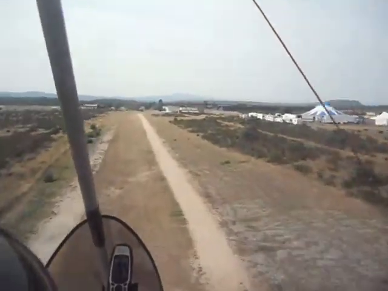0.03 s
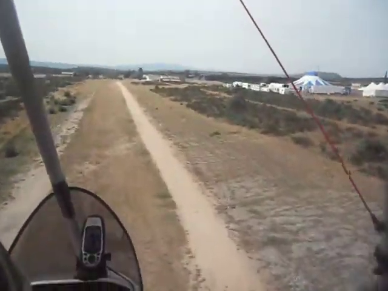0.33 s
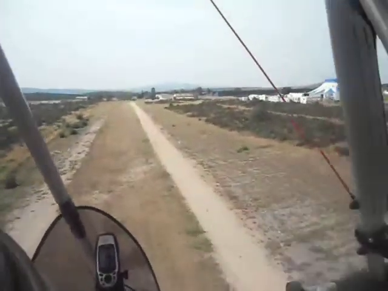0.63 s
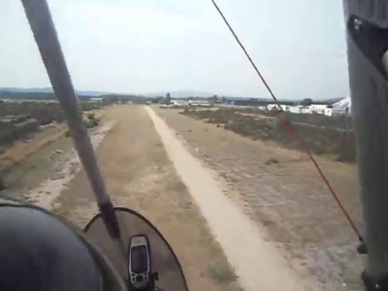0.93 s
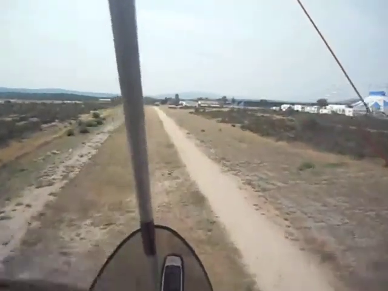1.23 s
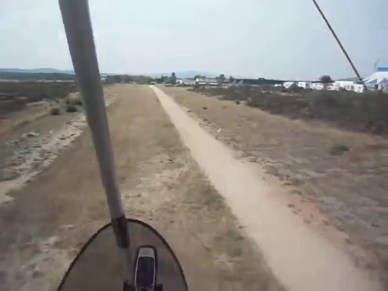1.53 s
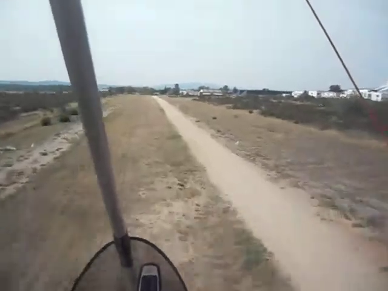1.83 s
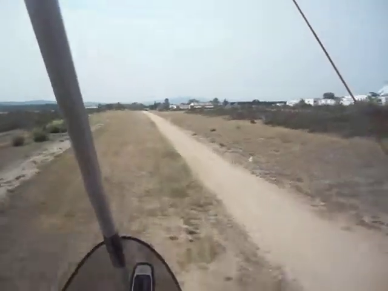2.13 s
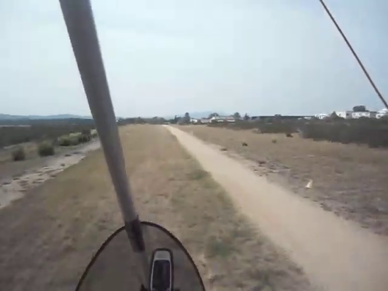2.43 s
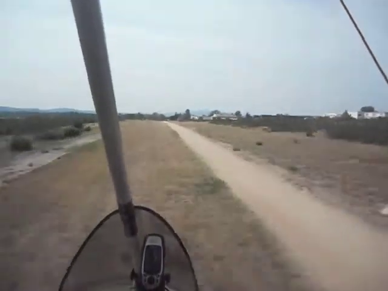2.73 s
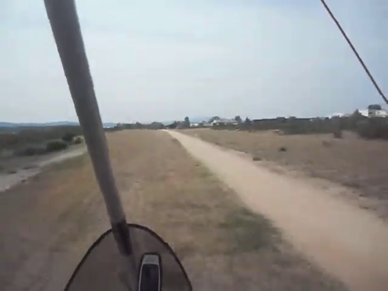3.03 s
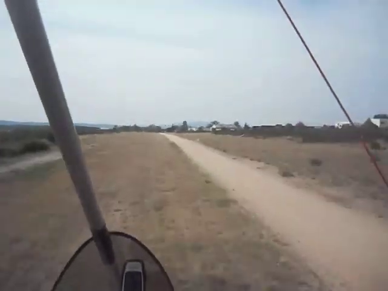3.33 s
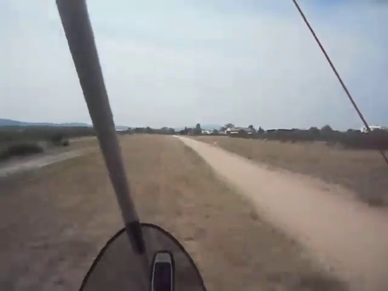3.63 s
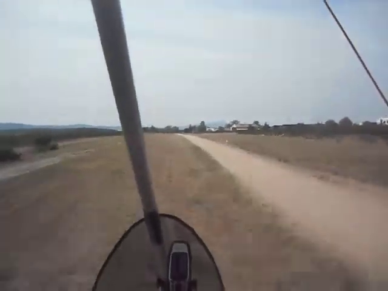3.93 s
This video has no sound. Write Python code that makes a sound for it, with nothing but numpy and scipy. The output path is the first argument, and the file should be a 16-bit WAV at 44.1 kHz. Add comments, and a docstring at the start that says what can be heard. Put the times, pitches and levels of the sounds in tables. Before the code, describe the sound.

Rough, rumbling wind buffets and overloads a microphone aboard a small open aircraft descending over fields. It spits and crackles, drops out for instants and growls in one stronger gust, then eases slightly near the ground.

```python
"""On an open ultralight gliding down to a dirt strip, wind roars over a camera microphone and is all one hears.
Large eddies thump, smaller ones roar and tear into spits of hiss and crackle. Now and then the airstream
drops away for an instant or slaps back. A hollow hum wanders in the rumble; the strongest gust growls.
The overloaded microphone squashes the peaks; near the ground the flow gets smoother and a little quieter."""
import sys
import numpy as np
from scipy import signal
from scipy.fft import rfft, irfft
from scipy.io import wavfile
from scipy.ndimage import uniform_filter1d

SR = 44100
rng = np.random.default_rng(int(sys.argv[2]) if len(sys.argv) > 2 else 0)


def transcribe(signal):
    """Save signal, clipped to [-1, 1], as a 16-bit WAV file at the path in sys.argv[1]."""
    frames = np.atleast_2d(signal).T
    limited = np.clip(frames, -1, 1)
    pcm = np.round(limited * 32767).astype(np.int16)
    wavfile.write(sys.argv[1], SR, pcm)


N = 176400

# airstream faders: t/s, buffet level/dB, roar level/dB, hiss level/dB, raggedness/0-1
AIRSTREAM = [(0, -14.5, -13.5, -27.5, 0.6), (.25, -14.5, -14, -28, 0.77), (.55, -14.5, -14, -26.5, 0.39),
             (.9, -19.5, -15, -26.5, 0.28), (1.1, -12.5, -13.5, -27.5, 0.77), (1.4, -17, -13.5, -27, 0.6),
             (1.55, -17.5, -13, -25.5, 0.63), (1.74, -13, -14, -34, 0.94), (1.9, -14.5, -13, -25, 0.57),
             (2.1, -14, -11, -31, 1), (2.3, -17, -15.5, -28.5, .55), (2.599, -17, -14.5, -26.5, 0.43),
             (2.901, -14, -15.5, -30.5, 0.74), (3.1, -16.5, -15.5, -27.5, 0.33),
             (3.32, -25, -19.5, -29.5, 0.31), (3.47, -20.5, -17, -29, 0.33), (3.701, -15, -16.5, -29, 0.36),
             (3.881, -20.5, -14.5, -28.5, 0.34), (4, -23, -16.5, -29, 0.36)]
# the air leaves the microphone (lulls) or slaps back (blasts): t/s, length/s, hiss/dB, roar/dB
LULL_DIPS = [(0.057, 0.018, -13, -9.5), (0.143, 0.0092, -9, -10), (.187, .015, -19, -13),
             (.22, .021, -24, -19), (.435, .018, -1, -11), (0.497, 0.0063, -29, -6), (.645, .02, -3, -14),
             (1.009, 0.023, -11, -6), (1.127, 0.012, -19, -7), (1.597, .024, -10, -3),
             (1.654, .018, -15, -10), (1.707, .008, -14, -6), (1.807, .008, -11, -5),
             (2.005, .015, -10, -4), (2.114, 0.021, -18, -9), (2.339, 0.0069, -11, -1),
             (2.405, .012, -2, -5), (2.58, 0.015, -10, -2.5), (2.816, 0.01, -14, -6.5),
             (2.89, 0.032, -6, -3.5), (2.925, 0.021, -8, -1.5), (2.957, 0.0096, -3, -7),
             (3.024, 0.015, -7, -8), (3.43, 0.0074, -15, -8)]
BLAST_HITS = [(0.024, 0.049, 3.5, 0.5), (0.241, 0.013, -0.5, 4), (0.575, 0.011, 5.5, 6.5),
              (1.133, 0.0091, 8.5, 3), (1.62, .022, 4, 2), (1.667, 0.017, 7, 4.5), (2.413, 0.0094, 3.5, 1),
              (.202, .013, 5, 6), (2.61, .035, 4, 2), (2.829, .01, 7, 6), (2.942, .012, 8, 8),
              (3.054, 0.02, 2, 1.5), (3.435, .012, -3, 6), (3.735, 0.0099, -5, 4)]
# tone colour of each wind layer: f/Hz, level/dB
BUFFET_EQ = [(6, -38), (16, -1), (40, -1), (70, -2), (120, -8), (200, -18), (500, -53), (1500, -94)]
ROAR_EQ = [(30, -11), (90, -7.5), (170, -1), (240, -0.5), (340, -0.5), (520, -4.5), (800, -8), (1300, -12),
           (2200, -20), (4000, -21), (10000, -78)]
HISS_EQ = [(300, -26), (900, -0.5), (1600, 7), (2300, 6), (3200, 1.5), (5000, -0.5), (7000, -2),
           (9000, -7.5), (10200, -12.5), (12000, -22)]
CRACKLE_EQ = [(300, -16), (1000, -2), (3000, 0.5), (6000, 1), (9000, 2), (10200, -2.5), (12000, -8)]
# the wandering hollow hum and the strongest gust's falling growl: t/s, f/Hz, level/dB
HUM_SWEEP = [(0, 180.6, -13), (.55, 180, -24.5), (0.899, 150, -28), (1.15, 144.9, -14.5),
             (1.349, 110, -19.5), (1.65, 135, -22), (1.85, 110, -17), (2.051, 131.1, -13.5),
             (2.249, 76.7, -20), (2.37, 35, -9), (2.548, 59.9, -49), (4, 102.2, -28.5)]
GROWL_SWEEP = [(1.8, 423.8, -49), (1.9, 373.3, -22), (1.999, 299.3, -19), (2.13, 312.6, -12),
               (2.221, 259.5, -22), (2.301, 228, -45)]

GUST_HZ, EDDY_HZ, SPIT_HZ, WAVER_HZ = 69, 317, 1200, 71  # modulation speeds
GUST_DB, EDDY_DB, SPIT_DB, PUSH_DB = 3, 11, 7, 5.5  # hiss flare depths, before raggedness and limiting
BUFFET_TRIM_DB, ROAR_TRIM_DB, HISS_TRIM_DB, CRACKLE_TRIM_DB = -1, 1, -1, -3
TIME, FREQS = np.arange(N) / SR, np.arange(N // 2 + 1) * SR / N


def undb(db):
    """Decibels to gain."""
    return 10 ** (np.asarray(db) / 20)


def colour(x, eq):
    """Shape x with an EQ curve and set its rms to 1."""
    hz, db = np.array(eq, float).T
    curve_db = np.interp(np.log(np.maximum(FREQS, 1)), np.log(hz), db)
    y = irfft(rfft(x) * undb(curve_db), N)
    return y / y.std()


def noise(eq):
    """Coloured noise of rms 1."""
    return colour(rng.standard_normal(N), eq)


def wobble(rate_hz):
    """Smooth random modulator of rms 1, rolling off above rate_hz."""
    y = irfft(rfft(rng.standard_normal(N)) / np.sqrt(1 + (2 * FREQS / rate_hz) ** 4), N)
    return y / y.std()


def flutter(db):
    """A fluctuating gain whose power stays near 1 over a quarter of a second."""
    gain = undb(db)
    return gain / np.sqrt(uniform_filter1d(gain ** 2, size=SR // 4))


def buffet(level_db):
    """Large eddies thump on the microphone."""
    return noise(BUFFET_EQ) * undb(BUFFET_TRIM_DB + level_db)


def hollow_tone(sweep):
    """Hum or growl: a gliding narrow band of pressure swings, wavering in strength and phase."""
    at, hz, db = np.array(sweep, float).T
    phase = 2 * np.pi * np.cumsum(np.interp(TIME, at, hz)) / SR
    band = wobble(WAVER_HZ) * np.cos(phase) + wobble(WAVER_HZ) * np.sin(phase)
    return undb(np.interp(TIME, at, db)) * band / np.sqrt(2)


def roar(level_db, gust, eddy, gust_db=1.7, eddy_db=3.8):
    """Smaller eddies roar in the low mids, shaken by the turbulence."""
    return noise(ROAR_EQ) * undb(ROAR_TRIM_DB + level_db) * flutter(gust_db * gust + eddy_db * eddy)


def overload(pressure, headroom=0.51, bias=0.24, muffle_hz=1840):
    """The microphone squashes large pressures, sooner on one side; a low-pass keeps the swings round."""
    squashed = headroom * (np.tanh(pressure / headroom - bias) + np.tanh(bias))
    return signal.sosfilt(signal.butter(2, muffle_hz, fs=SR, output="sos"), squashed)


def pressure_push(pressure, memory_s=0.0078, lag_s=0.0004, knee=0.073):
    """Sidechain from -1 to 1: how far the pressure has just risen above its recent mean."""
    decay = np.exp(-1 / (memory_s * SR))
    rise = pressure - signal.lfilter([1 - decay], [1, -decay], pressure)
    return np.tanh(np.interp(TIME - lag_s, TIME, rise) / knee)


def hiss(flare_db, limit_db=12):
    """Torn air spits: the hiss can flare only so far, but can drop much further."""
    limited_db = np.minimum(flare_db, limit_db * np.tanh(flare_db / limit_db))
    return noise(HISS_EQ) * flutter(limited_db)


def crackle(level_db, eddy, per_second=130, scatter_db=3.5, eddy_db=3):
    """Lone sharp pressure fronts snap at random, brighter than the hiss and stronger inside an eddy."""
    size = undb(scatter_db * np.clip(rng.standard_normal(N), -2, 2))
    polarity = np.sign(rng.standard_normal(N))
    fronts = size * polarity * (rng.random(N) < per_second / SR)
    return colour(fronts, CRACKLE_EQ) * undb(CRACKLE_TRIM_DB + level_db + eddy_db * (eddy - 1.5))


def jolts(cues):
    """Lulls or blasts: brief fader moves in dB for hiss and roar, flat-topped with quick edges."""
    moves_db = np.zeros((2, N))
    for at, length, hiss_db, roar_db in cues:
        shape = np.exp(-(2 * (TIME - at) / length) ** 4)
        moves_db += np.outer([hiss_db, roar_db], shape)
    return moves_db


def scene():
    """Mono wind: rumble and roar overload the microphone, and each push of pressure spits on top."""
    at, *faders = np.array(AIRSTREAM, float).T
    buffet_db, roar_db, hiss_db, ragged = (np.interp(TIME, at, fader) for fader in faders)
    hiss_jolt_db, roar_jolt_db = jolts(LULL_DIPS) + jolts(BLAST_HITS)
    gust, spit = wobble(GUST_HZ), wobble(SPIT_HZ)
    eddy = 1.5 * np.tanh(wobble(EDDY_HZ))
    rumble = buffet(buffet_db) + hollow_tone(HUM_SWEEP) + hollow_tone(GROWL_SWEEP)
    pressure = rumble * undb(roar_jolt_db / 2) + roar(roar_db + roar_jolt_db, gust, ragged * eddy)
    push = pressure_push(pressure)
    flare_db = ragged * (GUST_DB * gust + EDDY_DB * eddy + SPIT_DB * spit + PUSH_DB * push)
    top_end = hiss(flare_db) * undb(hiss_jolt_db)
    top_end += crackle(roar_jolt_db, eddy) * ragged * (1 + push)
    return (overload(pressure) + top_end * undb(HISS_TRIM_DB + hiss_db))[None]


def record(dry, ceiling=0.41, low_cut_hz=12, shelf_hz=10300, shelf_db=-12, top_hz=12000):
    """The camera soft-clips peaks, blocks subsonics, shelves down the highest treble and cuts the top."""
    y = dry / (1 + (dry / ceiling) ** 8) ** (1 / 8)
    y = signal.sosfilt(signal.butter(1, low_cut_hz, "high", fs=SR, output="sos"), y)
    shelf = undb(np.interp(FREQS, [shelf_hz, shelf_hz + 600], [0, shelf_db]))
    y = irfft(rfft(y) * shelf, N)
    return signal.sosfilt(signal.ellip(8, .2, 70, top_hz, fs=SR, output="sos"), y)


dry = scene()
out = record(dry)
transcribe(out)
```